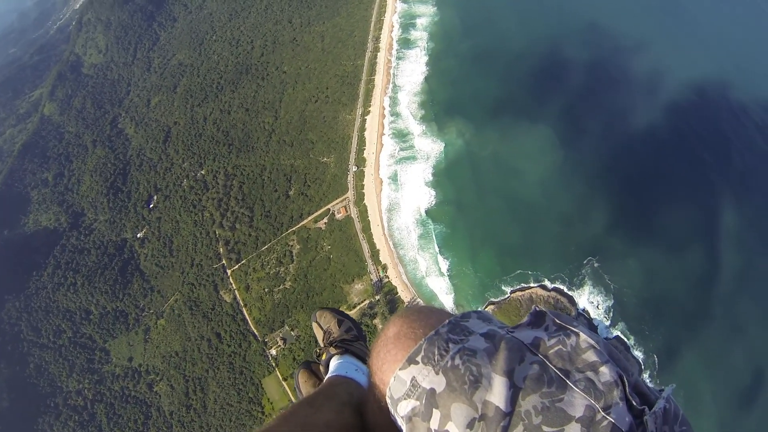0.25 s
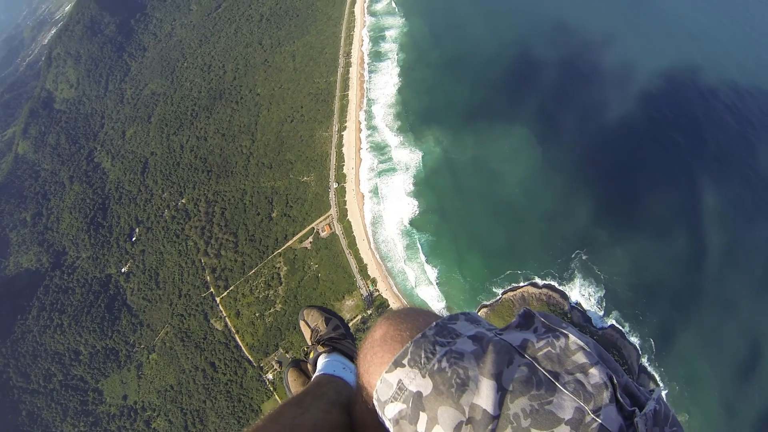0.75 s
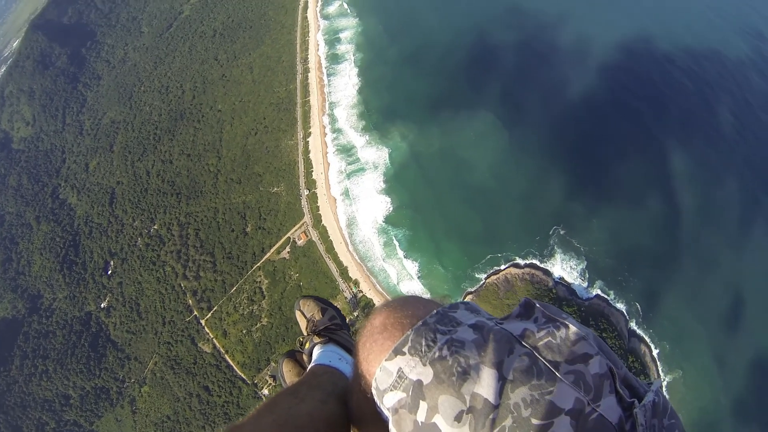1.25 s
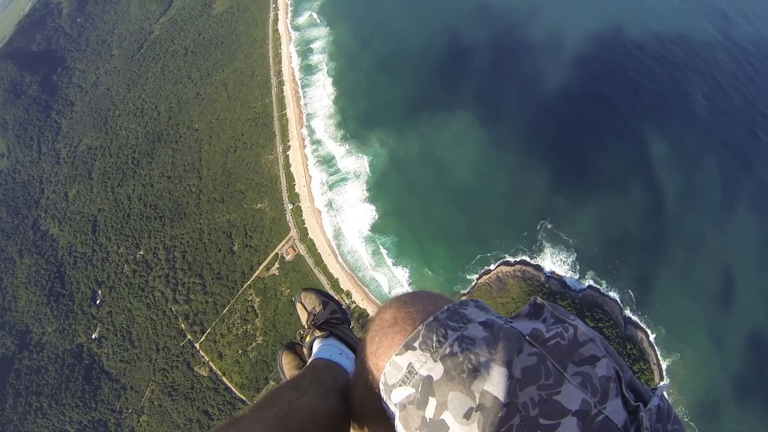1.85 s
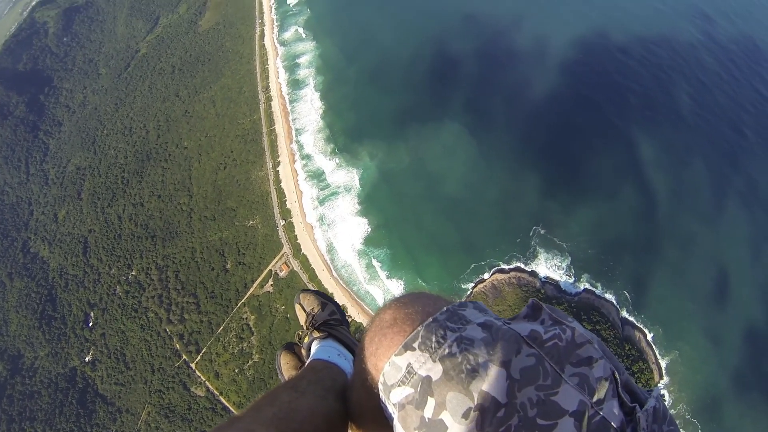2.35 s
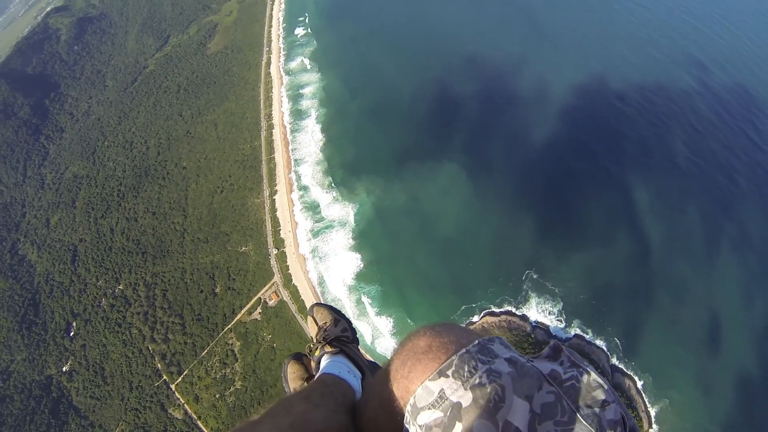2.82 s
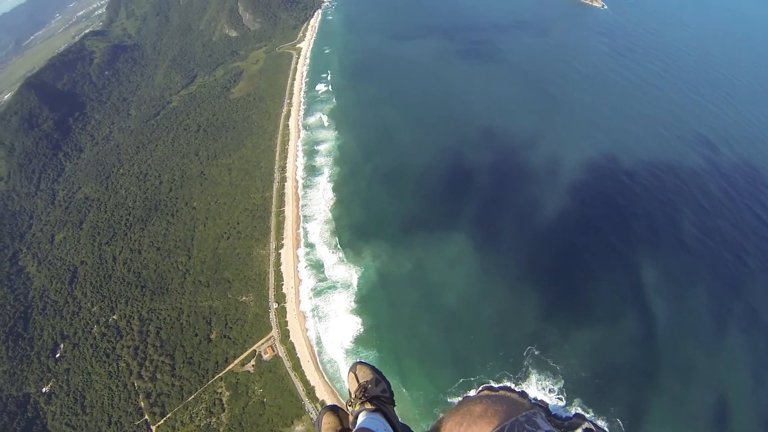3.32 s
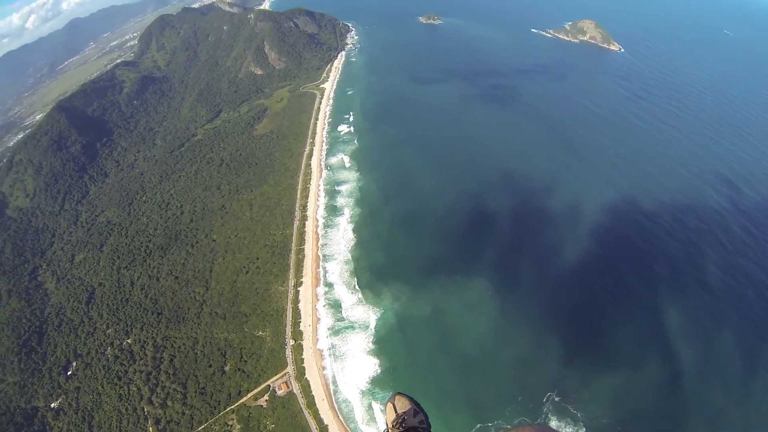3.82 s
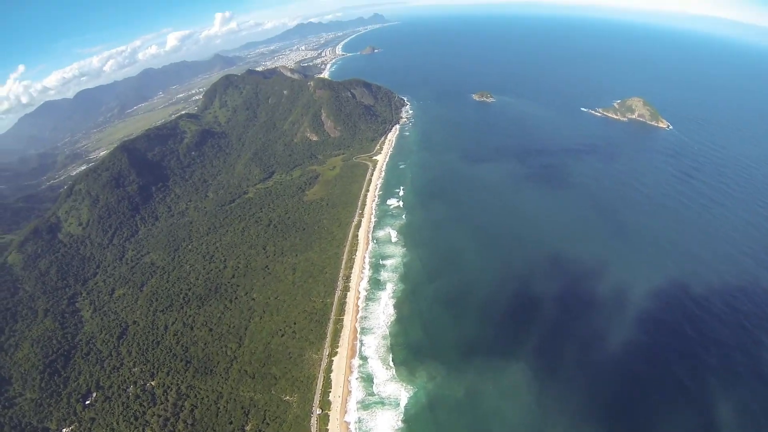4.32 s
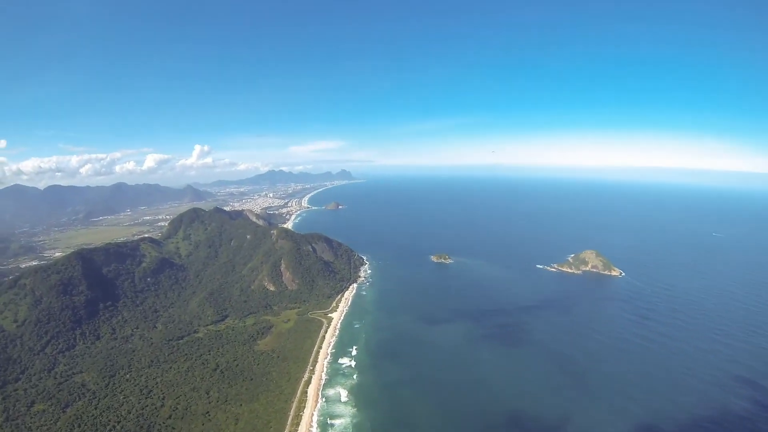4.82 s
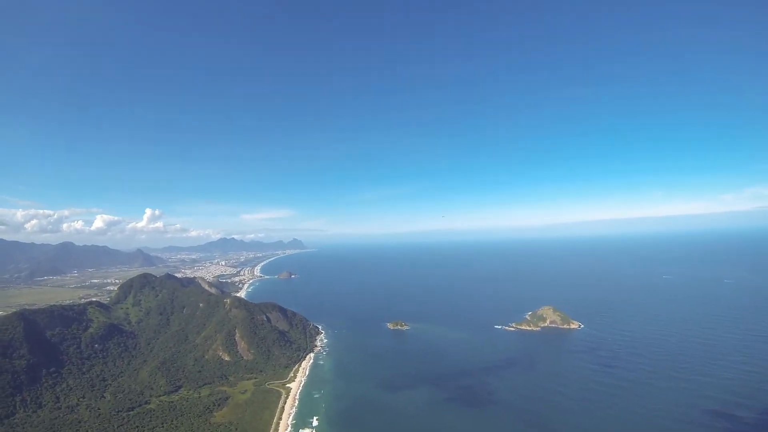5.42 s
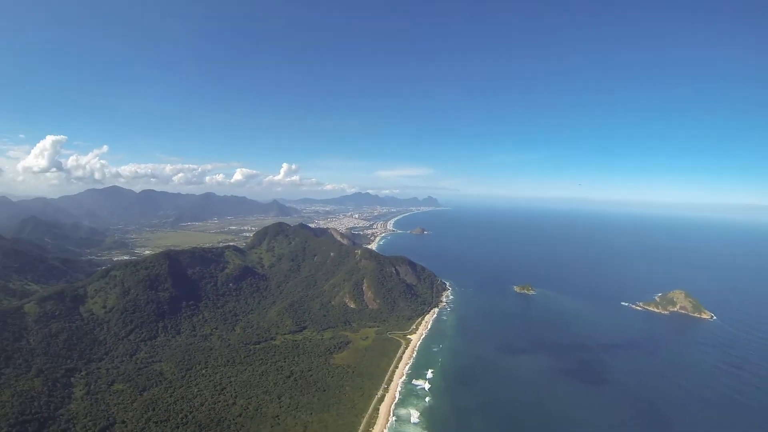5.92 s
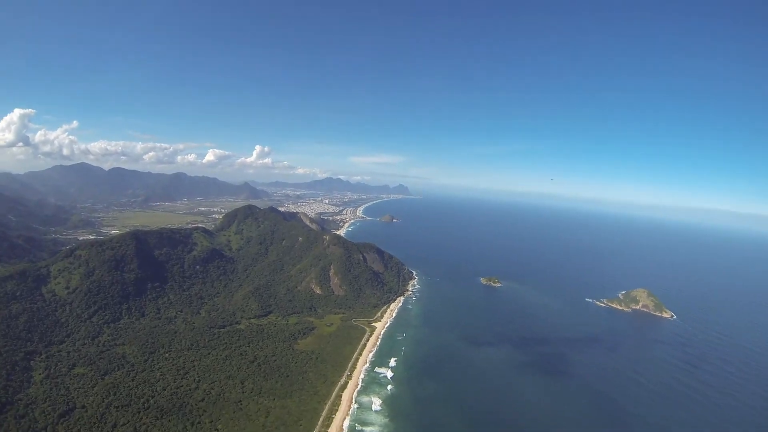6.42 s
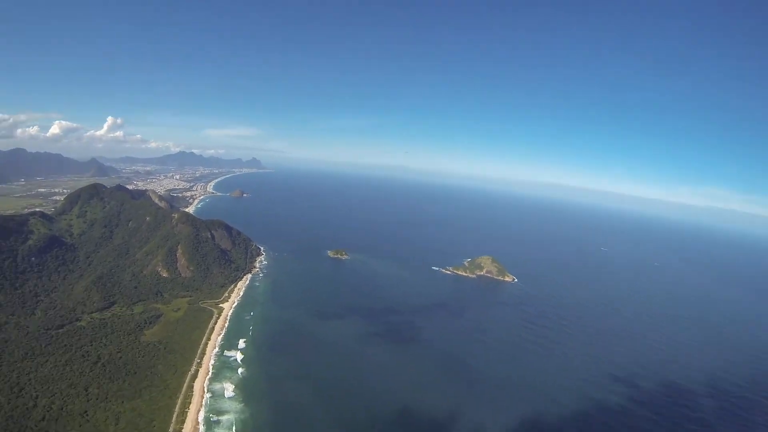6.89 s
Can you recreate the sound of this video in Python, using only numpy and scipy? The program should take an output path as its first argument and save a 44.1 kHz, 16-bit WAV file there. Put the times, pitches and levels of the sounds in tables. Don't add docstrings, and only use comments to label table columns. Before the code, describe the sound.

A small engine and propeller drone loudly and steadily with a rough, beating roar while low wind thumps buffet a nearby microphone high in the air.

```python
import sys
import numpy as np
from scipy import signal
from scipy.fft import rfft, irfft, next_fast_len
from scipy.io import wavfile
from scipy.ndimage import uniform_filter1d, minimum_filter1d, map_coordinates

SR = 44100
rng = np.random.default_rng(int(sys.argv[2]) if len(sys.argv) > 2 else 0)


def magnitude_from_level(level_db):
    exponent = np.asarray(level_db, float) / 20
    return 10 ** exponent


def wav_record(signal):
    frames = np.transpose(np.atleast_2d(signal))
    bounded = np.clip(frames, -1, 1)
    quanta = np.round(bounded * 32767).astype(np.int16)
    wavfile.write(sys.argv[1], SR, quanta)


N = 315315


def unit(x):
    return x / np.sqrt(np.mean(x ** 2) + 1e-20)


def curves(rows):
    time_s, *columns = np.transpose(rows)
    return [np.interp(np.arange(N) / SR, time_s, column) for column in columns]


def wobble(rate_hz):
    knots = rng.standard_normal(int(N * rate_hz / SR) + 4)
    return map_coordinates(knots, [np.arange(N) * rate_hz / SR])


def filtered(x, response):
    size = next_fast_len(N + 8192)
    return irfft(rfft(x, size) * response(np.fft.rfftfreq(size, 1 / SR)), size)[:N]


def shape(points):
    f, db = np.transpose(points)
    log_f = np.log(np.r_[f[0] / 2, f, f[-1] * 2])
    return lambda hz: magnitude_from_level(np.interp(np.log(hz + 1), log_f, np.r_[-200, db, -200]))


def patchy(depth_db):
    z = signal.stft(rng.standard_normal(N + 512), nperseg=512)[2]
    field = uniform_filter1d(rng.standard_normal(z.shape), size=7, axis=0)
    field = uniform_filter1d(field, size=10, axis=1)
    return signal.istft(z * magnitude_from_level(depth_db * unit(field)), nperseg=512)[1][:N]


def between(noise, down, ahead, lift, band):
    a = unit(filtered(noise, lambda hz: shape(down)(hz) * band(hz)))
    b = unit(filtered(noise, lambda hz: shape(ahead)(hz) * band(hz)))
    return (1 - lift) * a + lift * b


def chop(turns, count, sharp):
    once = np.cos(2 * np.pi * turns)
    passes = np.cos(2 * np.pi * count * turns + .5 * wobble(8.7))
    return np.exp(sharp * (once + 1.37 * passes))


def gate(cycle, blade, engine_sharp, blade_sharp):
    return chop(cycle, count=4, sharp=engine_sharp) * chop(blade + 0.26, count=2, sharp=blade_sharp)


# (time [s], firing rate [Hz])
FIRING_RATE = [(0, 39.55), (.5, 39.87), (1.125, 40.36), (1.55, 40.98), (1.875, 40.88), (2.2, 41.07),
               (2.53, 40.82), (2.75, 40.9), (3.25, 40.86), (3.55, 40.74), (3.83, 40.89), (4.36, 40.6),
               (4.73, 41.12), (5.0, 41.03), (5.625, 41.03), (6.25, 40.89), (6.6, 41.02), (7.15, 40.87)]
# (time [s], lift [0 down - 1 ahead], turn [0 - 1 toward the wind])
HEAD_MOTION = [(0, 0.15, 0.36), (3.15, 0, 0.33), (3.4, 0.45, 0.095), (3.7, 0.87, .1), (4.35, 0.73, 0.28),
               (4.55, 1, 0.93), (5.5, 1, 0.87), (6.3, 1, 0.94), (7.15, 0.83, 0.45)]
# (time [s], pose [0 head down - 1 rising - 2 ahead])
HEAD_POSE = [
    (0, 0),
    (2.3, 0),
    (2.6, 1),
    (4.35, 1),
    (4.7, 2),
    (7.15, 2),
]
# (time [s], level [dB])
REACH = [(0, -0.5), (.4, 2), (1.6, -1), (2, 0), (2.3, 0), (2.6, 3.5), (3.02, -2), (4, 4), (4.3, -.5),
         (4.6, 4), (5.1, 1.5), (5.22, -4.5), (5.3, -0.5), (5.46, -2.5), (5.61, 1.5), (6.3, -2), (7, 4),
         (7.15, -0.5)]


def paramotor():
    (rate_hz,), (lift, turn) = curves(FIRING_RATE), np.clip(curves(HEAD_MOTION), 0, 1)
    (reach_db,), (pose,) = curves(REACH), curves(HEAD_POSE)
    firings = np.cumsum(rate_hz - .021 + .025 * wobble(9)) / SR
    cycle = firings + .66
    blade = 1.3468 * firings + .45
    valve_turn, valve_sharp = .17, 45
    snap = np.exp(valve_sharp * (np.cos(2 * np.pi * (cycle - valve_turn)) - 1))
    strokes = np.exp(2 * np.cos(8 * np.pi * (cycle - valve_turn)) - 2)
    surge_db = 0.53 * wobble(15) + 0.45 * wobble(33)
    tones = exhaust(cycle, pose) + propeller(blade, pose) + whine(cycle, rate_hz)
    out = magnitude_from_level(-0.12 + 0.65 * reach_db) * tones
    out += roar(cycle, blade, snap, strokes, surge_db, lift, reach_db)
    out += rasp(cycle, blade, snap, surge_db, lift, pose, reach_db)
    return out + hiss(cycle, blade, snap, surge_db, lift, turn, reach_db)


def stack(orders, turns, pose, spread, flutter_db):
    out = np.zeros(N)
    for (k, *db), lag in zip(orders, rng.standard_normal(len(orders))):
        level = magnitude_from_level(np.interp(pose, range(len(db)), db) + flutter_db * wobble(3.07))
        phase = 2 * np.pi * k * turns + spread * lag + (.12 + .009 * k) * wobble(5)
        out += np.sqrt(2) * level * np.cos(phase)
    return out


# (multiple of firing rate, head-down rms [dB], rising rms [dB], ahead rms [dB])
EXHAUST_ORDERS = [(1, -29, -38, -29), (2, -23, -26, -29), (3, -25, -26, -29), (4, -35, -36, -39),
                  (5, -36, -34, -37), (6, -41, -34, -38), (7, -33, -33, -38), (8, -36, -39, -41),
                  (9, -37, -36, -47), (10, -32, -35, -41), (11, -37, -36, -36), (12, -41, -40, -39),
                  (13, -35, -40, -41), (14, -46, -42, -39), (15, -45, -46, -42), (16, -42, -45, -50),
                  (17, -52, -50, -46), (18, -53, -40, -39), (19, -40, -41, -42), (20, -51, -45, -41),
                  (21, -46, -50, -42), (22, -40, -36, -39), (23, -41, -45, -47), (24, -47, -47, -42),
                  (25, -46, -43, -42), (26, -38, -36, -37), (27, -41, -36, -42), (28, -45, -42, -42),
                  (29, -55, -44, -44), (31, -45, -44, -47)]


def exhaust(cycle, pose):
    return stack(EXHAUST_ORDERS, cycle, pose, spread=1.027, flutter_db=1.7)


# (multiple of blade rate, head-down rms [dB], rising rms [dB], ahead rms [dB])
BLADE_ORDERS = [(1, -21, -21, -22), (2, -33, -36, -44), (3, -37, -38, -41), (4, -41, -41, -40),
                (5, -37, -36, -40), (6, -39, -42, -44), (7, -37, -39, -39), (8, -43, -39, -39),
                (9, -41, -40, -39), (11, -39, -50, -42), (12, -42, -44, -54), (13, -45, -53, -53),
                (14, -39, -47, -46), (15, -54, -45, -48), (16, -35, -35, -44), (17, -42, -45, -46),
                (18, -47, -53, -45), (19, -42, -46, -55), (20, -41, -37, -43), (21, -55, -50, -56),
                (22, -56, -58, -58), (23, -46, -46, -48), (24, -53, -53, -57), (26, -55, -50, -53),
                (27, -48, -46, -49), (28, -42, -49, -51), (29, -45, -47, -50), (30, -41, -50, -52),
                (31, -47, -60, -62), (32, -48, -51, -57)]


def propeller(blade, pose):
    return stack(BLADE_ORDERS, blade, pose, spread=1.25, flutter_db=0.05)


# (frequency [Hz], density [dB per Hz])
BODY_DOWN = [(100, -51.5), (200, -47.5), (290, -48), (400, -49), (600, -52), (890, -48.5), (1080, -50.5),
             (1370, -64), (1900, -66), (2500, -76), (3200, -77), (3900, -96.5), (4800, -98), (5600, -99)]
# (frequency [Hz], density [dB per Hz])
BODY_AHEAD = [(100, -49), (200, -52), (290, -52), (400, -53.5), (600, -56), (890, -51.5), (1080, -53.5),
              (1370, -59), (1900, -58.5), (2500, -70.5), (3200, -70), (3900, -82), (4800, -93), (5600, -90)]


def below_crossover(hz):
    return 1 / (1 + (hz / 1350) ** 8)


def roar(cycle, blade, snap, strokes, surge_db, lift, reach_db):
    noise = patchy(0.94) * gate(cycle, blade, 0.035, 0.081)
    noise *= (1 + .1 * snap + .7 * strokes) * magnitude_from_level(.5 * surge_db)
    return magnitude_from_level(-23.5 + reach_db) * between(noise, BODY_DOWN, BODY_AHEAD, lift, below_crossover)


def rasp(cycle, blade, snap, surge_db, lift, pose, reach_db):
    noise = patchy(0.32) * gate(cycle, blade, 0.05, 0.15) * (1 + .8 * snap) * magnitude_from_level(surge_db)
    band = lambda hz: (1 - below_crossover(hz)) * (hz < 3900)
    level_db = -31.5 + 0.74 * reach_db + np.interp(pose, range(3), [0, 1.5, 0.23])
    return magnitude_from_level(level_db) * between(noise, BODY_DOWN, BODY_AHEAD, lift, band)


# (frequency [Hz], density [dB per Hz])
HISS_DOWN = [(3900, -89.5), (5000, -92.5), (6000, -99), (6600, -93.5), (7300, -109), (8000, -105),
             (8600, -96), (9600, -103), (10700, -91.5), (11600, -102), (12400, -103), (13900, -107)]
# (frequency [Hz], density [dB per Hz])
HISS_AHEAD = [(3900, -87), (5000, -90.5), (6000, -96.5), (6600, -99), (7300, -107), (8000, -95),
              (8600, -91.5), (9600, -99.5), (10700, -93.5), (11600, -100), (12400, -100), (13900, -103)]


def hiss(cycle, blade, snap, surge_db, lift, turn, reach_db):
    noise = patchy(1.43) * gate(cycle, blade, 0.08, 0.098)
    noise *= (1 + .6 * lift * snap) * magnitude_from_level(0.59 * surge_db)
    level_db = -55 + 0.53 * reach_db + 2.5 * lift + 2 * turn
    return magnitude_from_level(level_db) * between(noise, HISS_DOWN, HISS_AHEAD, turn, lambda hz: 1)


def whine(cycle, rate_hz):
    teeth, resonance_hz, width_hz, level_db = 120, 4790, 60, -69
    near = 1 / (1 + ((teeth * rate_hz - resonance_hz) / width_hz) ** 4)
    tone = np.cos(2 * np.pi * teeth * cycle + wobble(30))
    return magnitude_from_level(level_db + 3 * wobble(12)) * near * tone


# (frequency [Hz], density [dB per Hz])
BUFFET = [(4, -39), (11, -11), (20, 4), (35, 2), (60, -2.5), (110, -5.5), (200, -27.5), (400, -36)]
# (time [s], level [dB])
WIND_LEVEL = [(0, -32), (.5, -31), (.75, -30), (1.3, -30), (1.78, -21.5), (1.9, -30), (2.65, -18),
              (3.42, -20), (3.58, -43), (3.9, -21), (4.04, -29), (4.6, -20), (5.26, -24), (5.38, -20),
              (6.17, -20), (6.41, -22), (6.7, -26.5), (7.15, -18)]
# (time [s], signed push [linear], gain dip [dB])
GUSTS = [(0.681, 0.23, 0.5), (0.859, -0.25, 3.5), (1.21, -0.54, 1.5), (1.358, -0.4, 1.5),
         (2.451, 0.21, 2.5), (2.526, 0.16, 3.5), (2.659, -0.29, 4.5), (3.113, 0.37, 2), (3.263, -0.4, 0),
         (3.535, -0.4, 2.5), (3.771, -0.28, 1.5), (4.106, 0.42, -2), (4.466, -0.41, 1.5), (4.905, -0.28, 2),
         (5.026, -0.38, 5), (5.378, 0.28, 0), (5.628, -0.47, 1.5), (5.827, 0.5, 3.5), (6.133, -0.15, 1),
         (6.388, -0.53, 4), (6.559, 0.66, 3.5), (6.758, 0.29, 3)]


def wind():
    noise = filtered(rng.standard_normal(N), shape(BUFFET))
    rumble = unit(magnitude_from_level(2.2 * wobble(10)) * noise)
    out = magnitude_from_level(curves(WIND_LEVEL)[0] + 2.0) * rumble
    t = np.arange(N) / SR
    for start_s, push, _ in GUSTS:
        u = (t - start_s) / 0.0055
        out += 0.45 * push * (1 - u * u) * np.exp(-.5 * u * u)
    return out


# (time [s], peak [dB])
BUCKLE_TAPS = [
    (4.4342, -10),
]
# (frequency [Hz], width [Hz], level [dB])
CASE_MODES = [(1100, 530, -7), (1970, 1400, 4.5), (3060, 620, 2.5), (5400, 1900, -32)]


def case_response(f):
    total = 0
    for k, (center, width, db) in enumerate(CASE_MODES):
        total = total + (-1) ** k * magnitude_from_level(db) * 1j * f * width / (center ** 2 - f * f + 1j * f * width)
    return total / (1 + 1j * f / 5000) ** 4


def taps():
    gap_s, loss_db = .0014, 3
    x = np.zeros(N)
    for start_s, peak_db in BUCKLE_TAPS:
        for k in range(5):
            at = round((start_s + k * gap_s * rng.uniform(.9, 1.1)) * SR)
            x[at] += (-1) ** k * magnitude_from_level(peak_db + 24 - loss_db * abs(k - .5))
    return filtered(x, case_response)


def scene():
    return (paramotor() + wind() + taps())[None]


def ducked(x, over_db, release_s):
    excess_db = np.clip(20 * np.log10(np.abs(x) + 1e-9) - over_db, 0, 12)
    held_db = -minimum_filter1d(-excess_db, size=881, origin=440)
    keep = np.exp(-1 / (release_s * SR))
    fading_db = signal.lfilter([1 - keep], [1, -keep], held_db)
    return x * magnitude_from_level(-.7 * uniform_filter1d(np.maximum(held_db, fading_db), size=90))


# (frequency [Hz], level [dB])
TREBLE_FLOOR = [(4000, -125), (5200, -93), (5900, -85), (7300, -82), (8600, -86), (9700, -85), (10700, -85),
                (12000, -83), (13000, -81), (13900, -76)]


def starved(x):
    hz, _, z = signal.stft(np.pad(x, (293, 0)), SR, "cosine", 2048)
    cell = np.sqrt(uniform_filter1d(np.abs(z) ** 2, size=2, axis=0))
    jump_db = 4.5 * rng.standard_normal((len(hz) // 16 + 1, z.shape[1]))
    jump_db = jump_db.repeat(16, axis=0)[:len(hz)]
    floor = shape(TREBLE_FLOOR)(hz)[:, None] * magnitude_from_level(jump_db)
    return signal.istft(z * (cell > floor), SR, "cosine", 2048)[1][293:293 + N]


def low_pass(x):
    return signal.sosfilt(signal.butter(12, 13900, fs=SR, output="sos"), x)


def record(dry):
    t, dip_db = np.arange(N) / SR, np.zeros(N)
    for start_s, _, depth_db in GUSTS:
        u = np.clip(t - start_s - .002, 0, 1)
        dip_db += 1.04 * depth_db * (1 - np.exp(-u / 0.0036)) * np.exp(-(u / 0.084) ** 2)
    ease_out = np.clip(t[::-1] * 500, 0, 1)
    x = ducked(dry[0] * ease_out * magnitude_from_level(0.76 - dip_db), over_db=-6.5, release_s=0.014)
    return low_pass(starved(x)[None])


dry = scene()
out = record(dry)
wav_record(out)
```